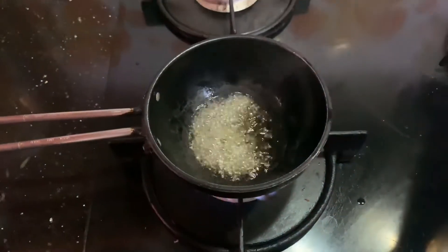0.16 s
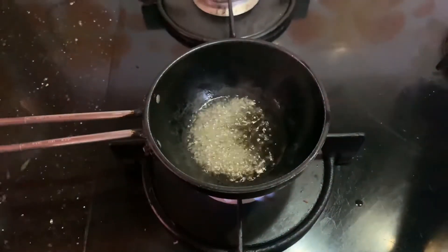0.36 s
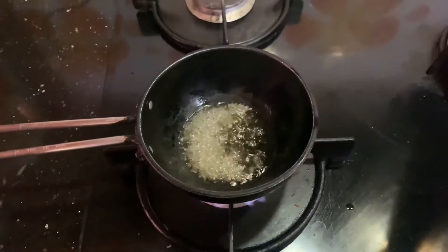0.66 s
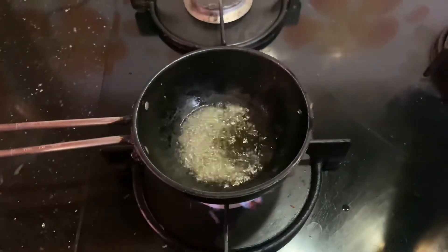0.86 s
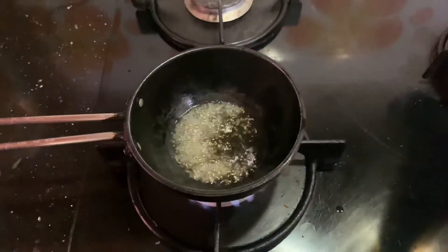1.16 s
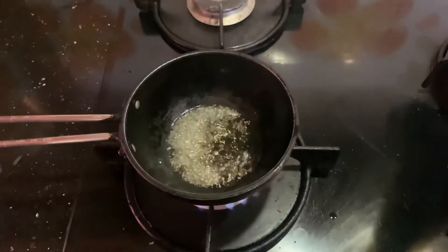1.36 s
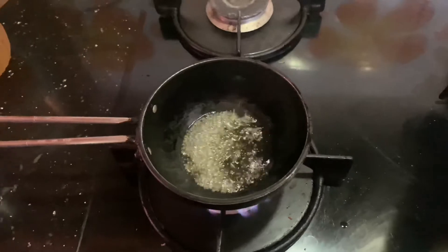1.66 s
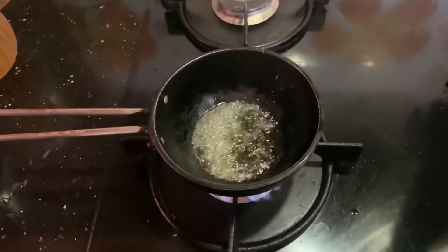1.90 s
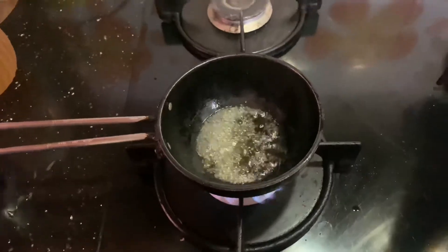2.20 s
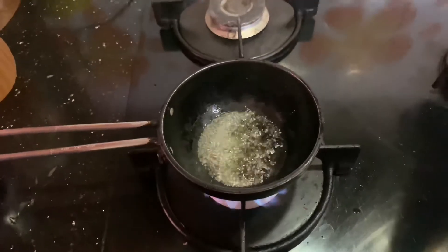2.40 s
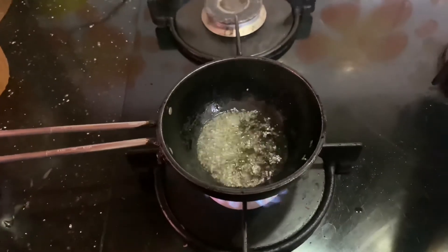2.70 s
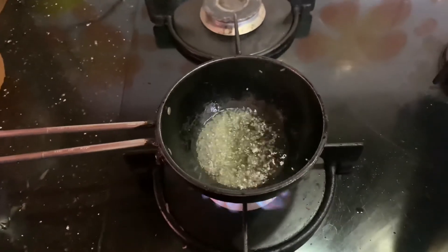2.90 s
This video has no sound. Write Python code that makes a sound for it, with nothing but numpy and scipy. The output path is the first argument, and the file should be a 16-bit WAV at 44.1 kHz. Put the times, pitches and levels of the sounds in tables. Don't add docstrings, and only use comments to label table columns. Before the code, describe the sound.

Mustard seeds pop in hot oil in a small pan, close up. Until 0.5 s light, scattered ticks sit over faint fizz and low flame flutter. A bright burst cracks at 0.6-0.7 s; a low air thump at 0.9 s briefly ducks the background. Pops thicken from 1.6 s into dense, dry crackling with knocks, droplet spatter and bubble plops, fizz growing until 3 s; short kitchen reflections.

```python
import sys
import numpy as np
from scipy import signal
from scipy.fft import rfft, irfft
from scipy.io import wavfile
from scipy.ndimage import uniform_filter1d

SR = 44100
rng = np.random.default_rng(int(sys.argv[2]) if len(sys.argv) > 2 else 0)


def master(y):
    cut = np.clip(np.atleast_2d(y).T, -1, 1)
    pcm = np.round(cut * 32767)
    wavfile.write(sys.argv[1], SR, pcm.astype(np.int16))


def rack_gain(trim_db):
    fader = np.asarray(trim_db, float)
    return 10 ** (fader / 20)


N = 134505

# start in seconds, crack level in dB, knock level in dB, knock pitch in Hz.
EARLY_POPS = [(0.0012, -18.5, -20.5, 5190), (0.0555, -20, -27, 6050), (0.1661, -20.5, -15.5, 3220),
              (0.188, -19, -34, 3990), (0.1994, -14.5, -11, 7050), (0.2685, -37, -31, 3900),
              (0.372, -31, -19, 4470), (0.4058, -19, -27, 7060), (0.4378, -20, -23, 3850),
              (0.4812, -13, -11, 3070), (0.5485, -33, -16, 4600), (0.5594, -31, -28, 4890),
              (0.5804, -13.5, -17, 4200), (0.595, -30, -21, 5830), (0.604, -30, -16, 6800),
              (0.611, -6.5, -8.5, 3160), (0.6185, -3.5, -11, 6360), (0.6446, -3, -8, 6540),
              (0.6542, -2, -13, 5440), (0.6592, -22, -24, 7050), (0.6905, 0, -14, 6760),
              (0.7017, 0, -10, 6500), (0.7047, -11, -15, 5320), (0.7108, -14, -12, 6800),
              (0.835, -21.5, -30, 5160), (0.8767, -14, -10.5, 4600), (0.8907, -9, -16, 6520),
              (0.9004, -4.5, -12.5, 6710), (0.9936, -26, -23, 3730), (1.008, -9, -25, 5840),
              (1.0304, -8.5, -23, 4560), (1.1566, -7.5, -17, 4100), (1.187, -8.5, -10, 2800),
              (1.227, -5, -21, 5900), (1.277, -13.5, -23.5, 4430), (1.302, -31, -30, 5510),
              (1.3162, -2.5, -15, 4760), (1.3224, -21, -23, 4680), (1.3873, -5, -30, 4790),
              (1.3954, -26, -17, 4550), (1.4208, -13, -28, 4960), (1.4835, -6.5, -16.5, 6400),
              (1.4951, -28, -25, 6540), (1.5344, -14.5, -22.5, 5770), (1.557, -20, -23, 6180)]
CROWDED_POPS = [(1.5974, -16, -9.5, 6940), (1.6112, -1.5, -8.5, 6500), (1.6252, -7, -5, 3950),
                (1.6553, -11, -7.5, 2560), (1.6768, -26, -18, 6190), (1.6868, -1.5, -10, 7060),
                (1.6959, -22, -10.5, 2600), (1.7033, -32, -17, 3050), (1.732, -16, -9, 5100),
                (1.7366, -8.5, -27, 4300), (1.7748, -12.5, -14.5, 6070), (1.796, -24, -19, 5340),
                (1.8001, -2.5, -25, 6360), (1.8148, -26, -10, 3700), (1.8259, -20, -29, 4420),
                (1.8364, -19, -19, 4870), (1.86, -2.5, -14.5, 6000), (1.8756, -6, -11.5, 5250),
                (1.885, -17, -15, 7200), (1.8963, -11, -21, 5660), (1.8992, -13, -23, 5680),
                (1.9453, -39, -16.5, 3100), (1.9528, -8.5, -11, 5160), (1.9811, -6.5, -18, 6700),
                (2.0376, -8.5, -20, 5200), (2.0555, -5, -14, 6230), (2.0928, -3, -12.5, 4800),
                (2.1172, -5, -12, 6260), (2.1537, -5, -16.5, 5740), (2.1854, -15, -14, 5100),
                (2.1983, -30, -11, 3800), (2.2021, -30, -30, 4830), (2.212, -18, -17, 5200),
                (2.2262, -6, -15, 4390), (2.2626, -5.5, -15, 7140), (2.2808, -19, -11, 3800),
                (2.2978, -5, -24, 6120), (2.3023, -8, -14, 5600), (2.314, -10, -16, 6480),
                (2.3169, -19, -24, 5370), (2.3363, -32, -24, 3020), (2.3558, -26, -24, 5940),
                (2.3698, -4, -15, 4900), (2.3768, -18, -23, 4640), (2.382, -10, -15.5, 2700)]
LATE_POPS = [(2.3919, -8, -12, 3000), (2.4061, -8, -18, 5970), (2.4087, -16, -10, 6650),
             (2.4353, -3.5, -11.5, 6570), (2.4485, -18, -11, 3500), (2.4663, -6, -10, 5020),
             (2.4803, -13, -14, 4150), (2.4934, -26, -13, 3820), (2.502, -23, -28, 7070),
             (2.5149, -0.5, -14.5, 4080), (2.529, -4, -13, 5200), (2.533, -2, -6.5, 3220),
             (2.538, -6, -19, 6740), (2.5447, -23, -17, 5010), (2.569, -12.5, -23, 6280),
             (2.5735, -22, -14, 3050), (2.586, -30, -17, 4790), (2.597, -8, -36, 4670),
             (2.599, -26, -8.5, 4820), (2.6266, -26, -14, 4240), (2.6373, -23, -40, 3750),
             (2.6686, -24, -15, 3070), (2.6918, -9.5, -13.5, 3860), (2.6962, -12, -5.5, 3280),
             (2.7202, -1.5, -22, 4450), (2.7263, -15, -6, 2720), (2.7464, -10, -3.5, 5370),
             (2.7506, -4, -20, 4490), (2.7591, -10, -5.5, 4800), (2.7652, -24, -20, 4240),
             (2.7724, -3.5, -15, 4380), (2.7812, -22, -4, 4300), (2.7894, -11, -14, 4600),
             (2.8196, -32, -24, 4230), (2.8336, -10.5, -17.5, 5000), (2.838, -19, -22.5, 2800),
             (2.8718, -15, -16.5, 3380), (2.8886, -3.5, -17, 5900), (2.9295, -3.5, -14, 3500),
             (2.9492, -7, -18.5, 5670), (2.9678, -13, -18, 4140), (3.0112, -13, -23, 5290),
             (3.0247, -35, -11.5, 2440), (3.032, -9, -19, 4090), (3.0449, -10, -24, 4210)]
# frequency in Hz, level in dB, 60 dB decay time in seconds.
PAN_MODES = [(1290, -7, 0.045), (1890, -16, 0.033)]
# start in seconds, level in dB, bubble pitch in Hz.
STEAM_BUBBLES = [(0.1671, -16, 1325), (0.354, -33, 563), (0.364, -24.5, 1080), (0.4395, -29.5, 1250),
                 (0.4836, -20, 1230), (0.5504, -21.5, 1320), (0.582, -20, 1270), (0.6456, -23, 1400),
                 (0.7012, -23, 1360), (0.876, -31, 1360), (1.11, -34.5, 1060), (1.2894, -23, 1370),
                 (1.474, -24.5, 1446), (1.627, -29, 1370), (1.6548, -11, 1780), (1.702, -16, 1320),
                 (1.9433, -25.5, 1890), (2.1998, -19, 1790), (2.5334, -26, 1885), (2.67, -18, 1610),
                 (3.0232, -9.5, 2360)]
# start in seconds, level in dB, fade time in seconds.
AIR_PUFFS = [
    (0.71, -24.5, 0.015),
    (0.902, -15.5, 0.0084),
    (2.7201, -24, 0.019),
]
# time in seconds, level in dB.
FIZZ_GROWTH = [(0, -46), (1.2, -44.5), (2.3, -43), (3.05, -40.5)]
# frequency in Hz, gain in dB.
FIZZ_SPECTRUM = [(700, -23.5), (1250, 5), (2400, -3), (6500, -2.5), (12000, 1), (14300, 3.5), (14800, -38)]
# frequency in Hz, gain in dB.
FLAME_SPECTRUM = [(25, -44), (60, 3), (95, -6), (290, -14), (900, -22.5), (1300, -19.5), (2500, -72)]
# frequency in Hz, lead of the left port besides its lag in radians.
PORT_PHASE = [(0, 0), (1380, 3.2), (3100, 9.7), (6500, 13.6), (16000, 13.8)]
# frequency in Hz, level in dB.
CASE_SPECTRUM = [(1800, -10), (3200, 0), (6000, -3), (8300, -16), (14300, -16), (15000, -40)]
# start in seconds, end in seconds, gain change in dB.
GAIN_MOVES = [
    (0, 0.206, 3),
    (0.203, 0.318, -4),
    (0.345, 0.474, 4),
    (0.718, 0.836, -3),
    (0.908, 1.123, -11.5),
]


def level(x, db):
    return x * rack_gain(db) / np.sqrt(np.mean(x ** 2))


def colour(x, table):
    table = np.array(table)
    hz = np.fft.rfftfreq(N, 1 / SR)
    gain_db = np.interp(np.log(hz + 1), np.log(table[:, 0]), table[:, 1])
    return irfft(rfft(x) * rack_gain(gain_db), N)


def band(x, low_hz, high_hz, order):
    return signal.sosfilt(signal.butter(order, [low_hz, high_hz], "band", fs=SR, output="sos"), x)


def walk(rate):
    hold = int(SR / rate)
    steps = np.repeat(rng.standard_normal(N // hold + 1), hold)
    return 1.04 * uniform_filter1d(uniform_filter1d(steps, hold), hold)[:N]


def add(out, at_s, grain):
    i = int(at_s * SR)
    out[i:i + len(grain)] += grain[:N - i]


def ring(t, hz, t60, phase):
    return np.sin(2 * np.pi * hz * t + phase) * np.exp(-np.log(1000) * t / t60)


def unit_peak(x):
    return x / np.sqrt(2 * uniform_filter1d(x ** 2, size=17).max())


def pops():
    lead_s, rise_s, crack_fall_s, knock_fall_s = 0.002, 0.00035, 0.0002, 0.0005
    crack_gain_db, knock_gain_db, ring_db = -2.5, -4.5, -16
    spatter_db, spatter_s, spatter_spread = -16.5, 0.009, 0.38
    out, t = np.zeros(N), np.arange(SR // 14) / SR
    after = np.clip(t - lead_s, 0, 1)
    rise = np.exp(np.minimum(t - lead_s, 0) / rise_s)
    for at, crack_db, knock_db, hz in EARLY_POPS + CROWDED_POPS + LATE_POPS:
        noise = rng.standard_normal((4, len(t)))
        chance = rng.standard_normal((len(PAN_MODES) + 1, 2))
        crack = unit_peak(band(noise[0] * rise * np.exp(-after / crack_fall_s), 8000, 15200, order=3))
        knock = unit_peak(band(noise[1] * rise * np.exp(-after / knock_fall_s), hz / 2, hz * 1.5, order=2))

        drops = noise[2] * rack_gain(30 * uniform_filter1d(noise[3], size=40))
        fall_s = spatter_s * np.exp(spatter_spread * chance[-1, 0])
        drops = rack_gain(spatter_db) * drops * rise * np.exp(-after / fall_s)
        crack = crack + band(drops, 7800, 14300, order=6)
        knock = knock + 3 * band(drops, hz / 2, hz * 1.4, order=2)

        body = np.zeros(len(t))
        for (mode_hz, mode_db, t60), c in zip(PAN_MODES, chance):
            body += rack_gain(mode_db + 2 * c[0]) * ring(after, mode_hz * (1 + 0.075 * c[1]), t60, 0)
        dull = rack_gain(knock_gain_db) * knock + rack_gain(ring_db) * body
        pop = rack_gain(crack_db + crack_gain_db) * crack + rack_gain(knock_db) * dull
        add(out, max(at - lead_s, 0), pop)
    return out


def plops():
    rise_s, t60, gain_db = 0.00113, 0.014, 4.5
    out, t = np.zeros(N), np.arange(SR // 14) / SR
    for at, db, hz in STEAM_BUBBLES:
        note = ring(t, hz, t60, 0) + 0.5 * ring(t, hz * 1.105, t60 / 2, 0)
        note = note * (1 - np.exp(-(t / rise_s) ** 2))
        add(out, at - 1.602 * rise_s, rack_gain(db + gain_db) * note)
    return out


def puffs():
    turn_ratio = 2.53
    rise_s, phase = 0.0024, 0.75
    out, t = np.zeros(N), np.arange(1, SR // 10) / SR
    swing = np.sin(2 * np.pi * np.log(t / 0.0022) / np.log(turn_ratio) + phase)
    for at, db, fade_s in AIR_PUFFS:
        add(out, at, rack_gain(db) * swing * (1 - np.exp(-(t / rise_s) ** 2)) * np.exp(-t / fade_s))
    return out


def crackle():
    bursts_per_s, spread_db = 900, 4
    out, t = np.zeros(N), np.arange(200) / SR
    for at, pitch, size in rng.random((int(bursts_per_s * N / SR), 3)):
        hz = 3500 * 4 ** pitch
        add(out, at * N / SR, rack_gain(-spread_db * np.log(1 - 0.95 * size)) * ring(t, hz, 5 / hz, 0))
    return out


def hiss():
    flicker = 4 * walk(40)
    out = np.zeros(N)
    for hz in 600 * 1.5 ** np.arange(8):
        own = rack_gain(2 * walk(23.57) + flicker)
        out += own * level(band(rng.standard_normal(N), hz, hz * 1.36, order=2), 10 * np.log10(hz))
    return out


def fizz():
    crackle_db = -4
    mix = level(colour(hiss(), FIZZ_SPECTRUM), 0) + level(colour(crackle(), FIZZ_SPECTRUM), crackle_db)
    growth = np.array(FIZZ_GROWTH)
    return level(mix, 0) * rack_gain(np.interp(np.arange(N) / SR, growth[:, 0], growth[:, 1]))


def flame():
    mid = level(colour(rng.standard_normal(N), FLAME_SPECTRUM), 0)
    hum_hz = 62 * (1 + 0.06 * walk(9))
    hum = np.sin(2 * np.pi * np.cumsum(hum_hz) / SR) * rack_gain(3.0 * walk(12) - 2)
    mid = (mid + hum) * rack_gain(2.5 * walk(3.14))
    side = level(colour(rng.standard_normal(N), FLAME_SPECTRUM), 0)
    side = colour(side, [(130, -14.5), (700, -3.5)])
    return level(mid + side * np.array([[1], [-1]]), -46)


def kitchen(x):
    room_db, t60, gap_s = -15, 0.2, 0.003
    t = np.arange(SR // 3) / SR
    tail = rng.standard_normal((2, len(t))) * np.exp(-np.log(1000) * t / t60) * (t > gap_s)
    tail = tail / np.sqrt(np.sum(tail ** 2) / 2)
    return rack_gain(room_db) * signal.fftconvolve(x[None], tail, axes=1)[:, :N]


def ports(x):
    lag_s, echo_fall_s = 0.000313, 0.0007
    hz, phase = np.fft.rfftfreq(N, 1 / SR), np.array(PORT_PHASE)
    turn = np.exp(1j * (np.interp(hz, phase[:, 0], phase[:, 1]) - 2 * np.pi * hz * lag_s))
    pair = np.array([irfft(rfft(x) * turn, N), x])

    t, scatter = np.arange(600) / SR, 0
    place = np.repeat(rng.integers(0, 10, N // 500 + 1), 500)[:N]
    for k in range(10):
        echo = rng.standard_normal((2, len(t))) * np.exp(-t / echo_fall_s)
        echo = echo / np.sqrt(np.sum(echo ** 2) / 2)
        part = pair * np.sqrt(np.abs(uniform_filter1d(1.0 * (place == k), size=100)))
        scatter = scatter + signal.fftconvolve(part, echo, axes=1)[:, :N]
    return pair + colour(scatter, CASE_SPECTRUM)


def phone_gain():
    t = np.arange(N) / SR
    gain_db = sum(db * ((t > start) & (t < end)) for start, end, db in GAIN_MOVES)
    return rack_gain(uniform_filter1d(gain_db, int(0.018 * SR)))


def scene():
    gain = phone_gain()
    pan = pops() + plops()
    direct = ports(pan + fizz() * np.sqrt(gain))
    room = colour(kitchen(pan), [(14000, 8), (14800, -55)]) * gain
    puff = puffs()
    t = np.arange(N) / SR
    late_puff = np.interp(t - 0.0003, t, puff)
    return direct + room + np.array([puff, 0.9 * late_puff]) + flame() * gain


def low_pass(x):
    return signal.sosfilt(signal.butter(12, 17140, fs=SR, output="sos"), x)


def record(dry):
    x = signal.sosfilt(signal.ellip(8, 0.5, 70, 16100, fs=SR, output="sos"), dry)
    return low_pass(np.tanh(x))


dry = scene()
out = record(dry)
master(out)
```